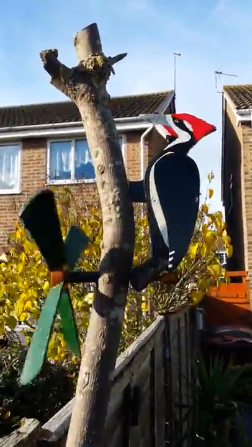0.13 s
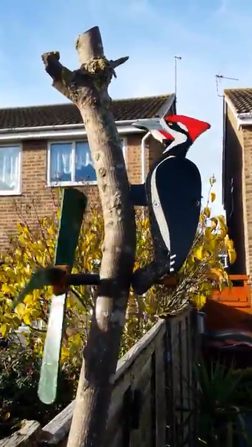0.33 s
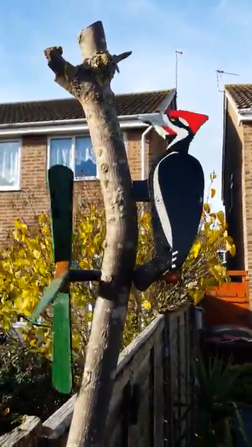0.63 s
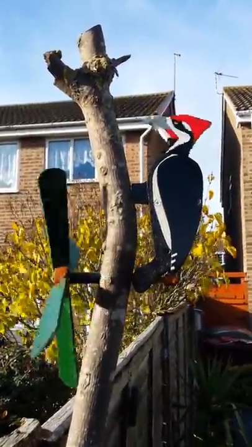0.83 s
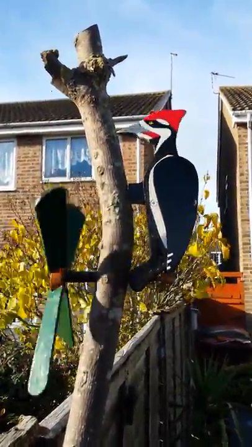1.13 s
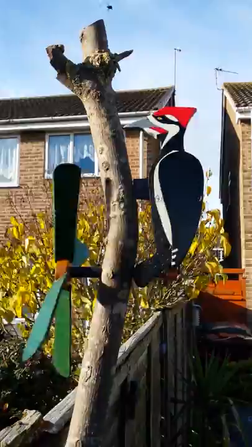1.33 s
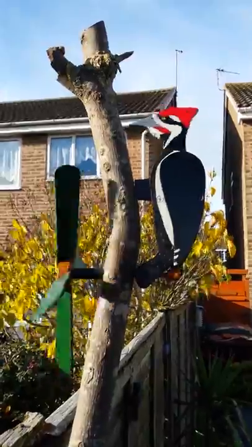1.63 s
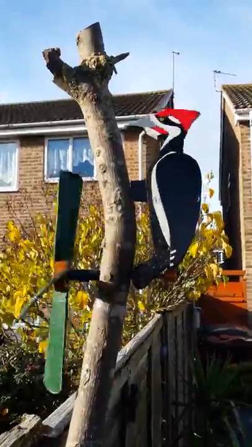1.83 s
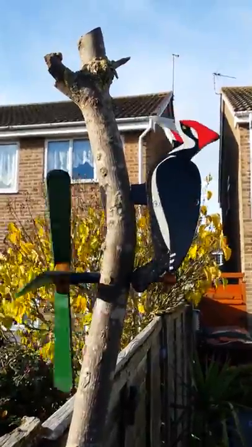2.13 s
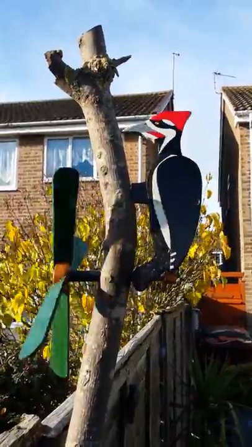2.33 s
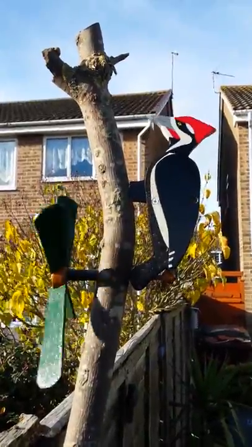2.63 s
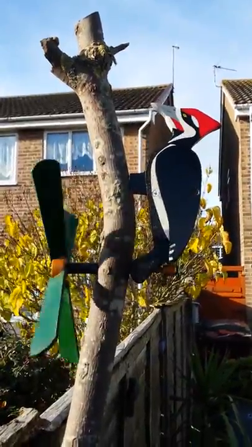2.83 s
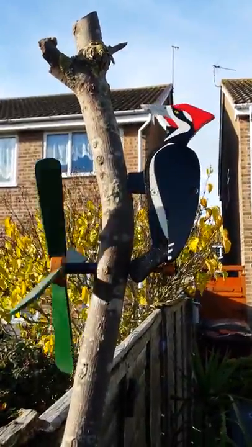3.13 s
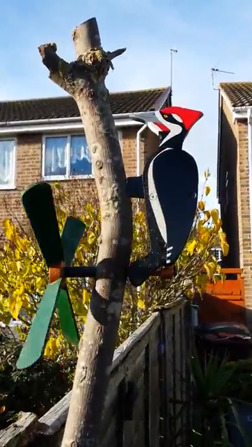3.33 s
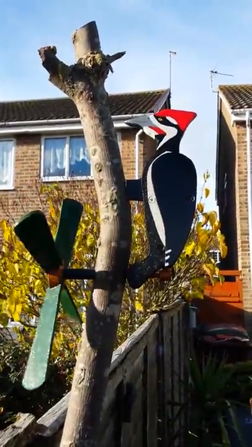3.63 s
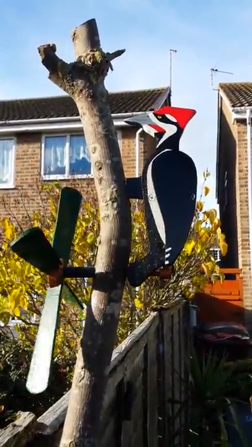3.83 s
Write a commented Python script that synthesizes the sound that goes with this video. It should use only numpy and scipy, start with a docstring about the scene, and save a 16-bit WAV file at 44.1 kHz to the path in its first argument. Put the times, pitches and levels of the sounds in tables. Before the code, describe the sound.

Wind buffets the microphone in a garden, mostly on the right. Strong, crackling gusts fill the first second, peaking near 0.3 and 0.9 seconds. The wind eases from about 1.3 to 2.1 seconds, builds into a low rumble around 2.9, then drops, with a small gust near the end. A wooden wind spinner ticks and knocks faintly and irregularly until about 3 seconds, over a soft hiss of leaves.

```python
"""Garden wind on a microphone

Gusty wind strikes the two ports of a small microphone, the right one hardest. Eddies drift
past each port: faster air squeezes their pressure pattern into higher, sharper crackle.
Leaves hiss behind; a wooden wind spinner knocks and its linkage ticks.
A faint, narrow band of hiss near 12.7 kHz swells and fades."""
import sys
import numpy as np
from scipy import signal
from scipy.fft import rfft, irfft
from scipy.io import wavfile
from scipy.ndimage import uniform_filter1d, minimum_filter1d, map_coordinates

SR = 44100
rng = np.random.default_rng(int(sys.argv[2]) if len(sys.argv) > 2 else 0)


def put_to_file(sound):
    """Save the sound as 16-bit audio at rate SR, in the file named by the first command-line argument."""
    columns = np.atleast_2d(sound).T  # one column per channel
    safe = np.clip(columns, -1, 1)
    whole_steps = np.round(safe * 32767)
    wavfile.write(sys.argv[1], SR, whole_steps.astype(np.int16))


N = 176400

# Leaf spectrum at each port. Each row: frequency in Hz, relative spectral level in dB.
LEAF_SPECTRUM_LEFT = [(100, 5.5), (300, -9), (700, -4.5), (2500, -5.5), (4500, -4.5), (6000, 1),
                      (6700, -0.5), (7600, -14.5), (9500, -16.5), (12000, -31.5), (15500, -35)]
LEAF_SPECTRUM_RIGHT = [(100, 14.5), (300, -23.5), (700, -6), (1600, -10), (4500, -11.5), (6200, -13.5),
                       (7500, -9.5), (9000, -12), (11500, -18.5), (15500, -24.5)]
# Swell of the leaves. Each row: time in seconds, relative level in dB.
LEAF_SWELL = [(0, -55), (.3, -59.5), (.9, -57), (1.3, -58), (2.0, -58), (2.35, -54.5), (2.699, -52),
              (3.0, -52.5), (3.35, -52.5), (3.62, -57), (3.85, -51.5), (4, -51)]
# Scrapes of the linkage. Each row: time of the peak in seconds, relative level in dB.
LINKAGE_TICKS = [(0.069, -54), (0.083, -49.5), (0.175, -54), (0.192, -49), (0.262, -42.5), (0.374, -51.5),
                 (0.477, -51), (0.544, -50.5), (0.561, -51), (0.636, -53), (0.765, -51), (0.785, -51),
                 (0.836, -53), (1.128, -50.5), (1.211, -54.5), (1.231, -54), (1.32, -58), (1.341, -50.5),
                 (1.404, -52), (1.412, -52), (1.418, -46.5), (1.436, -51), (1.576, -51.5), (1.65, -56),
                 (1.66, -49.5), (1.683, -51.5), (1.824, -53), (1.856, -57.5), (1.931, -54.5), (1.955, -52),
                 (2.023, -53), (2.036, -55), (2.228, -56), (2.306, -48), (2.319, -49), (2.333, -55),
                 (2.533, -55), (2.71, -54.5), (3.063, -54)]
# Tick spectrum at each port. Each row: frequency in Hz, relative spectral level in dB.
TICK_SPECTRUM_LEFT = [(1500, -4), (3300, 12.5), (6000, 0), (8000, -9), (10000, -4), (12000, -27),
                      (15500, -41)]
TICK_SPECTRUM_RIGHT = [(1500, 6), (3300, 3), (6000, 7.5), (7600, 8.5), (9100, 7.5), (9700, 13), (10300, 2),
                       (11500, 2), (15500, -3.5)]
# Bursts of contacts. Each row: midpoint in seconds, relative peak level in dB, length in seconds.
SPINNER_KNOCKS = [(0.188, -39, 0.0083), (0.482, -28.5, 0.00375), (0.559, -42, 0.00329),
                  (0.774, -43, 0.0055), (0.85, -40, 0.0043), (1.244, -40, 0.0077), (1.346, -41, 0.008),
                  (1.567, -45, 0.0071), (1.623, -50, 0.005), (1.652, -47, 0.0051), (1.825, -42, 0.016),
                  (1.937, -49.5, 0.0054), (2.121, -34, 0.0039), (2.316, -38.5, 0.011), (2.763, -43, 0.0052)]
# Modes of the spinner. Each row: frequency in Hz, relative level in dB, 60 dB decay time in seconds.
WOOD_MODES = [(740, -8.5, .1), (1400, -1, .012), (1780, 0, .011), (2250, -1, .009), (2700, -6, .007),
              (3300, -8, .007), (4300, -12, .005)]
# Eddy pressure spectrum. Each row: spatial frequency in cycles per eddy length, relative level in dB.
EDDY_SPECTRUM = [(.02, 1.5), (.06, 0), (.25, -2.5), (.65, -3.5), (1.05, -9), (2.01, -20), (3.5, -28.5),
                 (8, -20)]
# Wind at each port. Each row: time in seconds, base air speed in m/s, base level in dB.
WIND_LEFT = [(0.0, 0.34, -37), (0.103, 0.91, -24.5), (0.206, 0.49, -39), (0.273, 1.12, -27.5),
             (0.518, 0.4, -53), (0.578, 1.254, -28), (0.662, 0.47, -53), (0.729, 0.77, -26),
             (0.789, 0.37, -47), (0.849, 0.38, -29), (0.9, 0.43, -64), (0.996, 0.48, -20),
             (1.051, 1.01, -23), (1.094, 0.39, -28), (1.11, 0.43, -13), (1.155, 0.91, -9),
             (1.189, 1.85, -27), (1.235, 0.63, -28), (1.27, 1.23, -23.5), (1.303, 0.41, -26),
             (1.395, 0.64, -23.5), (1.518, 0.37, -44), (1.605, 0.41, -34), (1.741, 0.42, -60),
             (2.448, 0.44, -51), (2.531, 0.41, -39), (2.694, 0.43, -48), (2.783, 0.37, -47),
             (2.808, 0.58, -24), (2.959, 0.4, -29), (3.023, 0.4, -22.5), (3.183, 0.44, -55),
             (3.28, 0.31, -33), (3.339, 0.44, -45), (3.68, 0.4, -54), (3.714, 0.47, -31),
             (3.734, 0.35, -53), (3.756, 0.36, -20), (3.779, 0.44, -46), (3.828, 0.35, -22),
             (3.868, 0.44, -57), (3.991, 0.33, -34)]
WIND_RIGHT = [(0.0, 1.63, -10), (0.057, 2.84, -15.5), (0.073, 1.65, -12), (0.083, 3.42, -15.5),
              (0.094, 1.22, -11.5), (0.109, 2.78, -19.5), (0.142, 1.2, -16.5), (0.194, 1.65, -18),
              (0.208, 2.08, -9.5), (0.247, 1.404, -21), (0.258, 3.25, 1), (0.282, 3.38, -13.5),
              (0.295, 1.275, -20), (0.322, 7.43, -10.5), (0.332, 3.22, -23), (0.358, 5.06, -3.5),
              (0.376, 1.35, -21), (0.393, 4.3, -5), (0.406, 2.04, -11.5), (0.428, 4.52, -18),
              (0.446, 4.05, -12), (0.459, 1.2, -13.5), (0.482, 1.126, -27), (0.495, 1.2, -16),
              (0.515, 2.9, -7), (0.536, 1.82, -21), (0.546, 2.46, -16), (0.554, 1.075, -27),
              (0.566, 1.06, -18), (0.582, 3.23, -8), (0.595, 1.43, -40), (0.608, 3.18, -8),
              (0.618, 1.24, -17), (0.634, 1.09, -24), (0.652, 1.77, -17.5), (0.669, 0.8, -7),
              (0.695, 1.21, -22.5), (0.715, 3.04, -14.5), (0.726, 1.65, -29), (0.737, 2.4, -8.5),
              (0.779, 0.82, -30), (0.803, 1, -15), (0.826, 0.67, -24.5), (0.862, 2, -16),
              (0.882, 6.44, -4.5), (0.901, 8.95, -10), (0.92, 9.16, 5), (0.943, 3.89, 0), (0.968, 5.16, -5),
              (0.975, 1.87, -2), (0.991, 2.4, -20), (1.016, 5.06, -11.5), (1.064, 8.2, -7.5),
              (1.082, 3.14, -11), (1.11, 1.68, -12), (1.141, 1.1, -15), (1.158, 0.53, -30),
              (1.177, 0.36, -16), (1.25, 0.84, -17.5), (1.416, 0.4, -40.5), (1.472, 0.46, -32.5),
              (1.496, 0.54, -14), (1.541, 0.52, -28), (1.578, 0.67, -19.5), (1.617, 0.41, -29.5),
              (1.749, 0.56, -29.5), (1.782, 0.37, -58), (1.83, 0.33, -28), (1.898, 0.49, -49.5),
              (2.006, 0.4, -39), (2.03, 0.41, -54), (2.093, 0.44, -31), (2.145, 0.5, -15.5),
              (2.209, 0.46, -18), (2.233, 0.48, -15), (2.248, 0.52, -21.5), (2.302, 0.34, -23),
              (2.341, 0.44, -44), (2.366, 0.41, -22.5), (2.424, 0.28, -29), (2.469, 0.49, -26),
              (2.518, 0.41, -14.5), (2.583, 0.42, -14), (2.615, 0.54, -16.5), (2.638, 0.38, -30),
              (2.669, 0.41, -10), (2.741, 0.43, -21), (2.82, 0.69, -11.5), (2.844, 0.54, -9),
              (2.859, 0.73, -6), (2.887, 0.96, -14), (2.925, 0.93, -8.5), (2.955, 0.61, -12.5),
              (2.984, 1.35, -13), (3.014, 0.55, -15), (3.056, 0.53, -24), (3.103, 0.46, -18.5),
              (3.213, 0.35, -24.5), (3.36, 0.39, -23), (3.383, 0.39, -36.5), (3.425, 0.32, -18),
              (3.499, 0.47, -21.5), (3.534, 0.44, -33), (3.548, 0.39, -26), (3.586, 0.44, -14.5),
              (3.638, 0.38, -47.5), (3.699, 0.37, -57), (3.872, 0.68, -13.5), (3.892, 0.58, -21.5),
              (3.944, 0.38, -5.5), (3.966, 0.46, -30), (3.985, 0.7, -12)]
# Sudden puffs at the right port. Each row: time of the peak in seconds, rise of air speed in octaves.
PUFFS_RIGHT = [(0.207, 0.75), (0.236, 1.56), (0.305, 0.97), (0.342, 1.05), (0.416, 0.73), (1.0, 0.99),
               (1.158, 1.6), (2.135, 1.04), (2.157, 1.4), (2.171, 1.503), (2.188, 1.616), (2.233, 1.103),
               (2.515, 0.68), (2.541, 0.96), (2.609, 1.694), (2.664, 0.81), (2.762, 1.26), (2.79, 0.76),
               (2.805, 1.2), (2.823, 1.5), (2.862, 1), (2.897, 1), (2.918, 1.447), (2.942, 1.17)]


def amp(db):
    return 10 ** (np.asarray(db) / 20)


def unit_rms(x):
    return x / np.sqrt(np.mean(x ** 2) + 1e-20)


def level_at(spectrum, hz):
    """Levels in dB, interpolated on a logarithmic frequency axis."""
    f, db = np.transpose(spectrum)
    return np.interp(np.log(hz + 1e-6), np.log(f), db)


def add(mix, start_s, sound):
    """Superposition: sums a sound into the mix."""
    part = mix[..., max(round(start_s * SR), 0):][..., :sound.shape[-1]]
    part += sound[..., :part.shape[-1]]


def filtered(x, gains):
    """Linear filtering: one gain for each frequency bin."""
    return irfft(rfft(x) * gains, len(x))


def wander(size, hz):
    """Band-limited noise: a smooth drift up to about hz cycles per SR samples."""
    f = np.fft.rfftfreq(size, 1 / SR)
    return unit_rms(filtered(rng.standard_normal(size), f / (f + hz / 10) / (1 + (f / hz) ** 2)))


def leaves():
    """Incoherent sources sum to noise: leaves make a patchy hiss, almost unrelated at the two ports."""
    patch_db, flicker_db, correlation = 1.5, .83, .031
    frames, hz = N // 128 + 5, np.fft.rfftfreq(512, 1 / SR)
    a, b, c, d, patches = rng.standard_normal((frames, len(hz), 5)).T
    patches = unit_rms(uniform_filter1d(uniform_filter1d(patches, size=8, axis=0), size=12, axis=1))
    flicker = unit_rms(uniform_filter1d(rng.standard_normal(frames), size=3))
    left = a + 1j * b
    right = correlation * left + np.sqrt(1 - correlation ** 2) * (c + 1j * d)
    colour_db = np.array([level_at(LEAF_SPECTRUM_LEFT, hz), level_at(LEAF_SPECTRUM_RIGHT, hz)])
    gains = amp(colour_db[..., None] + patch_db * patches + flicker_db * flicker)
    _, hiss = signal.istft(np.array([left, right]) * gains, nperseg=512, noverlap=384)
    swell_db = np.interp(np.arange(N) / SR, *np.transpose(LEAF_SWELL))
    return unit_rms(hiss[:, :N]) * amp(swell_db + 10)


def high_hiss_band():
    """Band-pass filtered noise: a faint, narrow band of hiss near 12.7 kHz swells and fades."""
    start_s, length_s, centre_hz, width_hz = 2.624, .54, 12680, 350
    hz, t = np.fft.rfftfreq(N, 1 / SR), np.arange(N) / SR
    swell = np.sin(np.pi * np.clip((t - start_s) / length_s, 0, 1))
    band = filtered(rng.standard_normal(N), 1 / (1 + (2 * (hz - centre_hz) / width_hz) ** 2))
    return swell * unit_rms(band) * amp([[-78], [-61]])  # left, right


def linkage_ticks():
    """Friction noise: the linkage makes short bright scrapes, each tinted a little differently."""
    rise_s, tail_s, tail_db, spread_db = .0026, .038, -5.5, 3
    t, out = np.arange(2048) / SR, np.zeros((2, N))
    hz = np.fft.rfftfreq(len(t), 1 / SR)
    colours = [amp(level_at(spectrum, hz)) for spectrum in (TICK_SPECTRUM_LEFT, TICK_SPECTRUM_RIGHT)]
    pulse = (t / rise_s * np.exp(1 - t / rise_s)) ** 2
    tail = np.minimum(t / rise_s, 1) * np.exp(-t / tail_s) * np.cos(np.pi * t / t[-1] / 2)
    envelope = pulse + amp(tail_db) * tail
    for peak_s, db in LINKAGE_TICKS:
        noise = rng.standard_normal(len(t))
        tint = amp(spread_db * unit_rms(uniform_filter1d(rng.standard_normal(len(hz)), size=80)))
        scrape = np.array([filtered(noise, tint * colour) for colour in colours])
        add(out, peak_s - rise_s, unit_rms(scrape) * envelope * amp(db + 5))
    return out


def spinner_knocks():
    """Impact excitation: a brief chatter of contacts rings the damped modes of the wooden body."""
    contacts_per_s, contact_samples, spread_db, far_side_hz = 2100, 13, 3, 2860
    t, near = np.arange(4096) / SR, np.zeros(N)
    for middle_s, db, length_s in SPINNER_KNOCKS:
        hits = rng.standard_normal(len(t)) * (rng.random(len(t)) < contacts_per_s / SR)
        hits[round(length_s * SR / 2)] += 1  # one sure contact in the middle
        hits *= np.sin(np.pi * np.clip(t / length_s, 0, 1))
        force = np.convolve(hits, np.hanning(contact_samples))[:len(t)]
        tints_db = spread_db * rng.standard_normal(len(WOOD_MODES))
        body = sum(amp(mode_db + tint_db - 60 * t / t60) * np.sin(2 * np.pi * hz * t)
                   for (hz, mode_db, t60), tint_db in zip(WOOD_MODES, tints_db))
        ring = signal.fftconvolve(force, body)[:len(t)]
        add(near, middle_s - length_s / 2, ring / abs(ring).max() * amp(db + 9.5))
    # On the far side of the body the knocks are duller.
    dull = signal.sosfilt(signal.butter(2, far_side_hz, fs=SR, output="sos"), near)
    return np.array([near, amp(-.1) * np.roll(dull, -8)])


def eddy_row(size, samples_per_eddy):
    """Turbulent pressure along a line of air: large eddies are strong, the finest scales are smooth."""
    spread_db, skew, cutoff_cycles = .9, .19, 2.9
    cycles = np.fft.rfftfreq(size) * samples_per_eddy  # per eddy length
    row = unit_rms(filtered(rng.standard_normal(size), amp(level_at(EDDY_SPECTRUM, cycles))))
    row *= amp(spread_db * wander(size, 600))  # eddies differ in strength
    row += skew * (row ** 2 - np.mean(row ** 2))  # pushes are taller than pulls
    return unit_rms(filtered(row, np.exp(-(cycles / cutoff_cycles) ** 2)))


def bass_cut(pressure):
    """High-pass filtering: a slight resonance just above the corner, then a further cut of rumble."""
    corner_hz, ripple_db, rumble_hz = 83, 1.5, 40
    cut = signal.sosfilt(signal.cheby1(2, ripple_db, corner_hz, "high", fs=SR, output="sos"), pressure)
    return signal.lfilter(*signal.butter(1, rumble_hz, "high", fs=SR), cut) * amp(ripple_db / 2)


def wind_buffet(wind, puffs=()):
    """Frozen turbulence: a fixed row of eddies is carried past a port, so frequency follows air speed."""
    eddy_m, size, samples_per_eddy = .002, 2 ** 19, 32
    jerk_hz, jerk_db, puff_s, puff_db_per_octave = 121.1, 2.14, .0035, 4
    row, t = eddy_row(size, samples_per_eddy), np.arange(N) / SR
    times, base_speed, base_db = np.transpose(wind)
    base_octaves = np.interp(t, times, np.log2(base_speed))
    jerk = 2 * np.tanh(wander(N, jerk_hz) / 2)
    jerk += .2 * (jerk ** 2 - 1)  # short surges over a calmer base
    jerk_depth = np.maximum(.2 + .075 * np.minimum(base_octaves, 1), 0)  # fast air jerks more
    puff_octaves = sum(rise * np.exp(-abs(t - peak_s) / puff_s) for peak_s, rise in puffs)
    speed = 2 ** (base_octaves + puff_octaves + jerk_depth * jerk)
    position = np.cumsum(speed / eddy_m) * samples_per_eddy / SR % (size - 1)
    pressure = map_coordinates(row, [position], order=3, mode="wrap")
    level_db = np.interp(t, times, base_db) + jerk_db * jerk + puff_db_per_octave * puff_octaves
    return bass_cut(pressure) * amp(level_db)


def scene():
    """Superposition: wind, leaves, spinner and the high band of hiss add in each channel."""
    wind = np.array([wind_buffet(WIND_LEFT), wind_buffet(WIND_RIGHT, PUFFS_RIGHT)])
    return wind + leaves() + linkage_ticks() + spinner_knocks() + high_hiss_band()


def record(dry):
    """Peak limiting: the gain drops at the strongest peaks and soon recovers; a low-pass follows."""
    ceiling, recovery_db_per_s, hold_samples, edge_hz = .97, 396, 61, 15730
    recovery_db = np.arange(N) * recovery_db_per_s / SR
    over_db = np.maximum(20 * np.log10(abs(dry) / ceiling + 1e-9), 0)
    cut_db = np.maximum.accumulate(over_db + recovery_db, axis=1) - recovery_db
    held_db = -minimum_filter1d(-cut_db, size=hold_samples, axis=1)
    smooth_db = uniform_filter1d(held_db, size=hold_samples, axis=1)
    low_pass = signal.firwin(511, edge_hz, window=("kaiser", 9), fs=SR)
    return signal.oaconvolve(dry / amp(smooth_db), low_pass[None], "same")


dry = scene()
out = record(dry)
put_to_file(out)
```